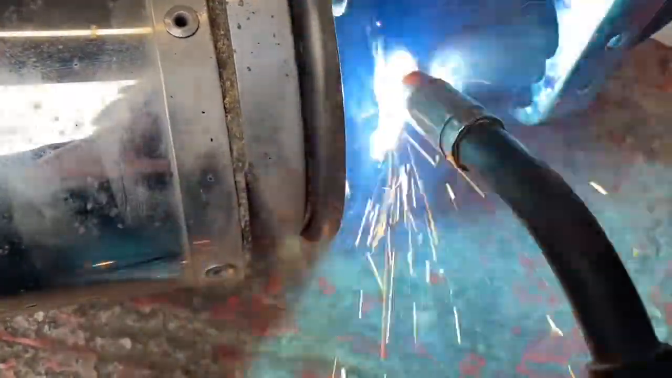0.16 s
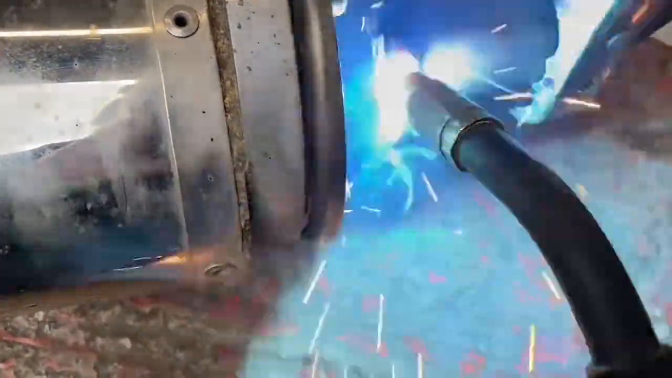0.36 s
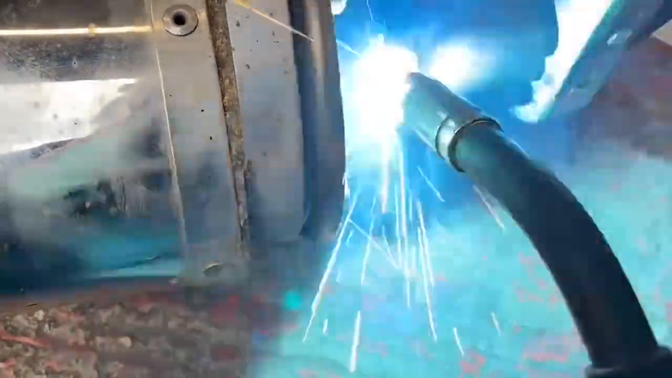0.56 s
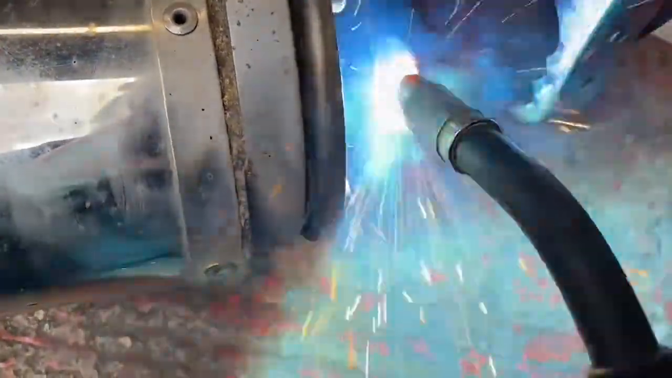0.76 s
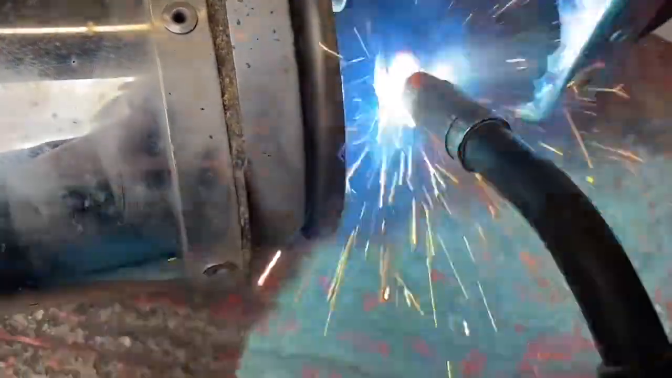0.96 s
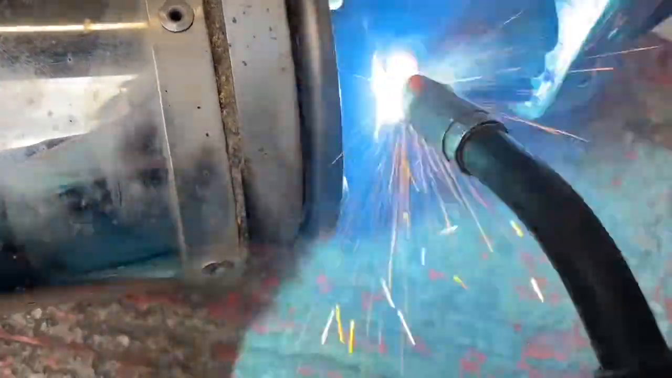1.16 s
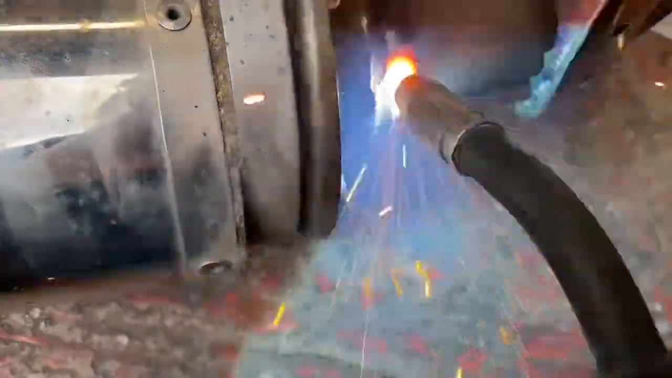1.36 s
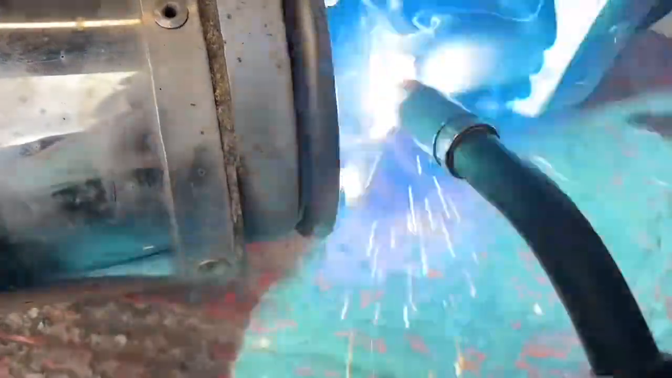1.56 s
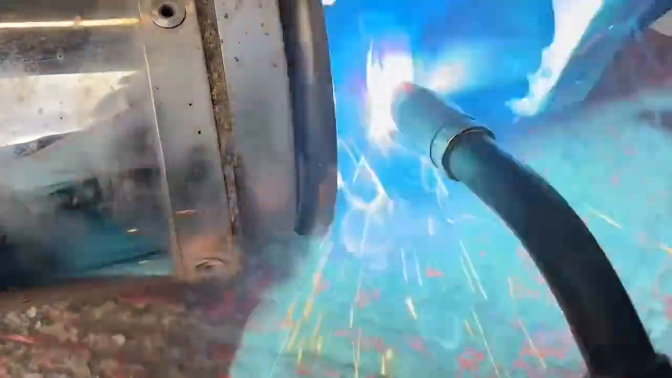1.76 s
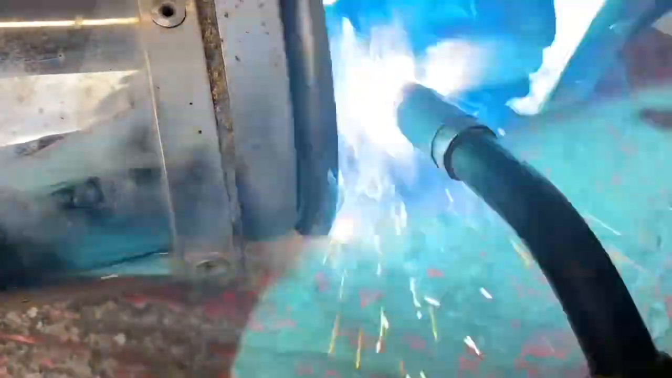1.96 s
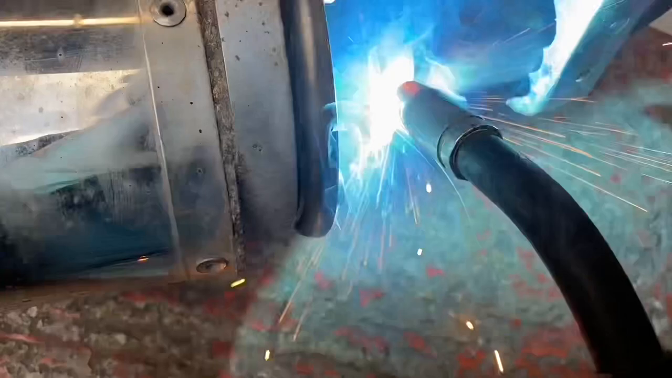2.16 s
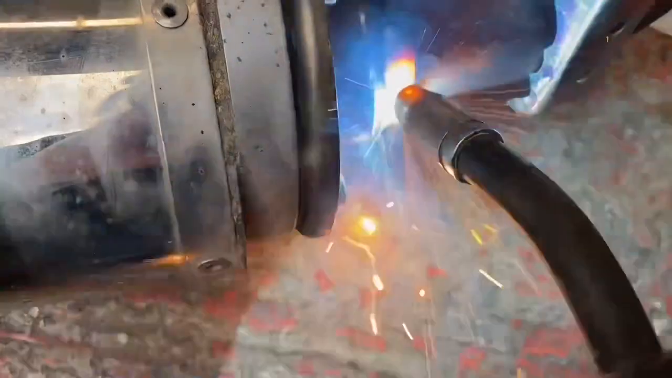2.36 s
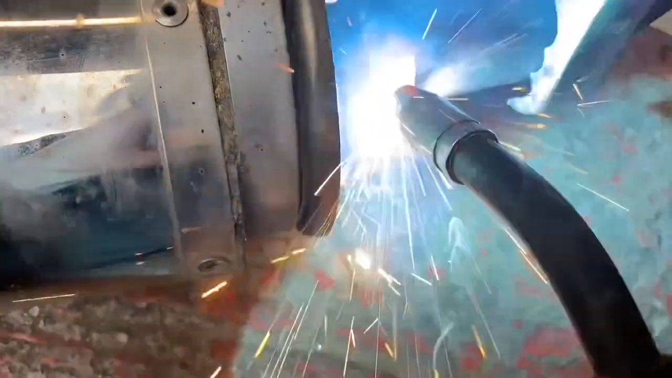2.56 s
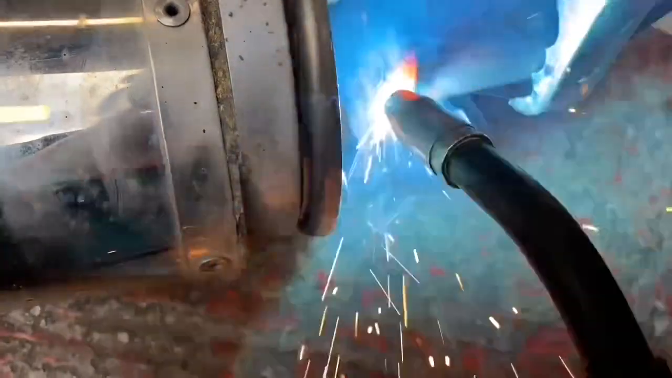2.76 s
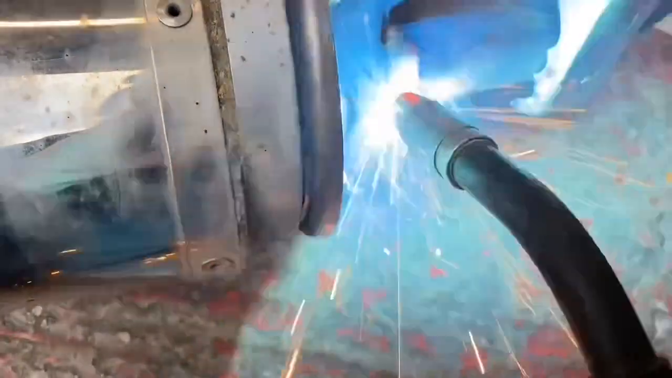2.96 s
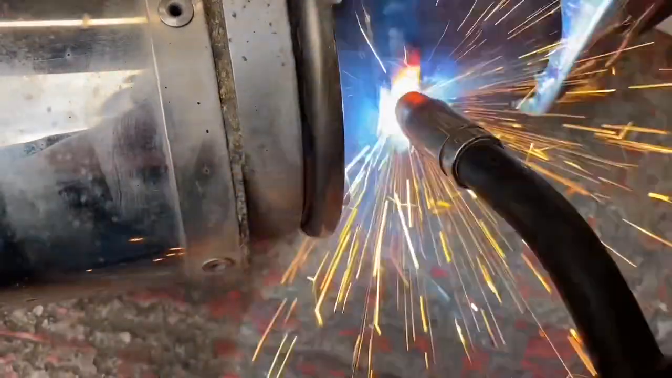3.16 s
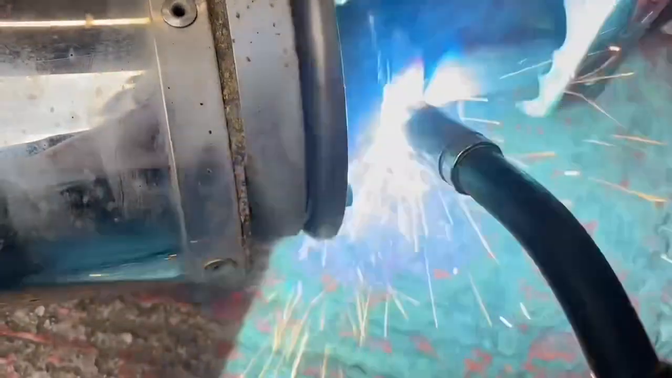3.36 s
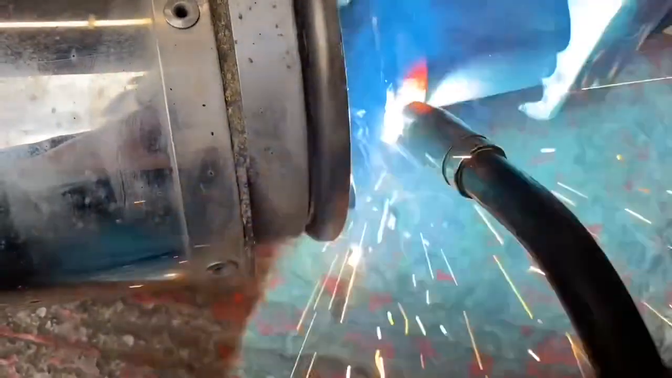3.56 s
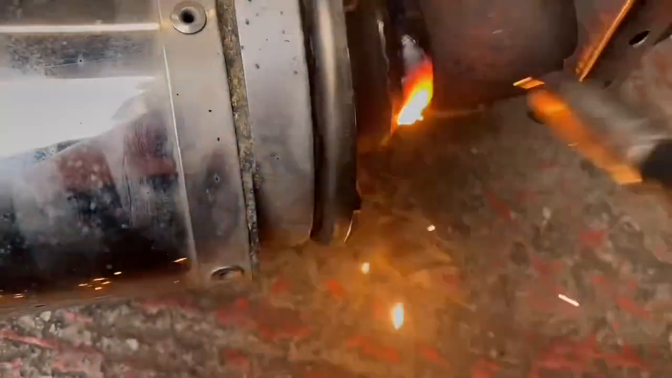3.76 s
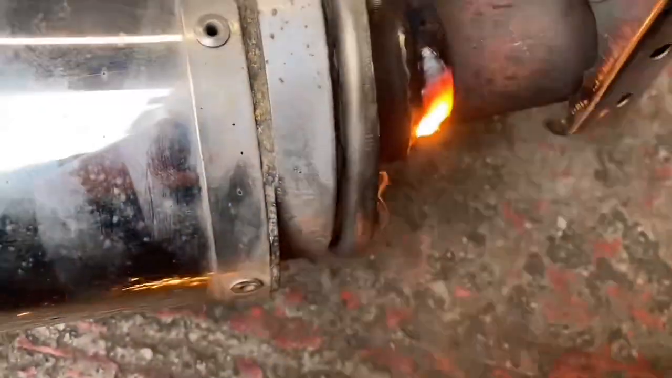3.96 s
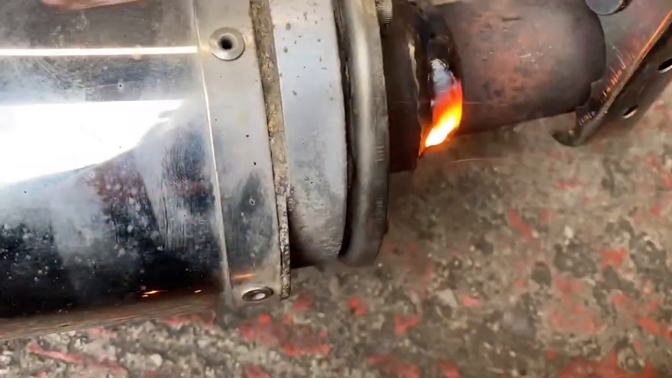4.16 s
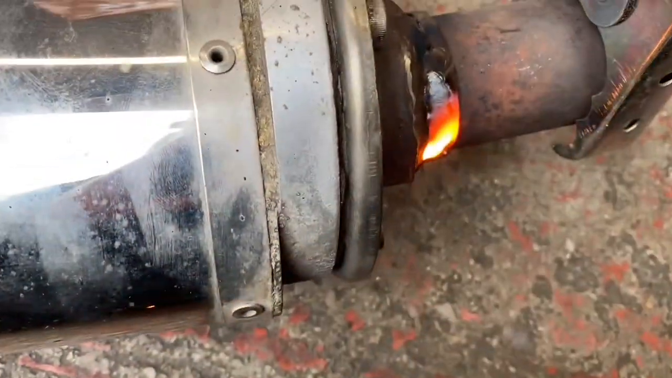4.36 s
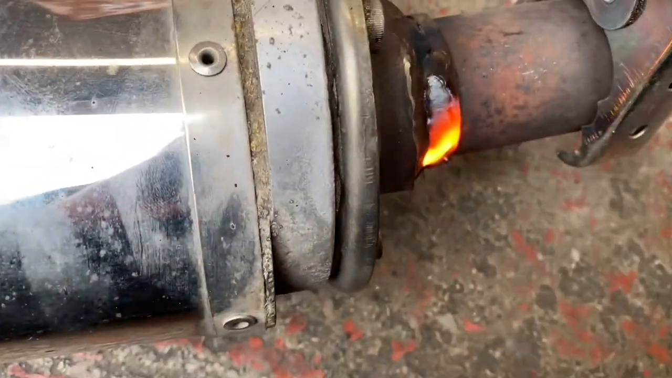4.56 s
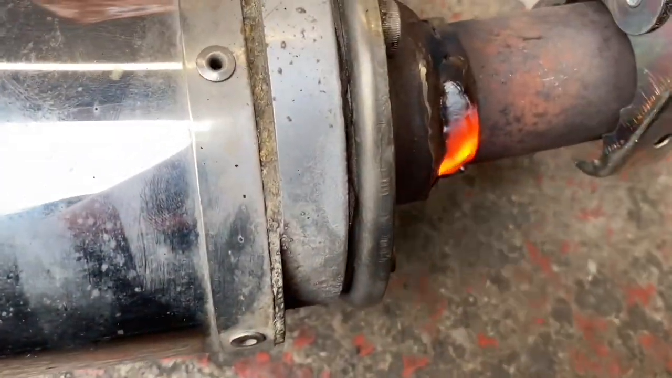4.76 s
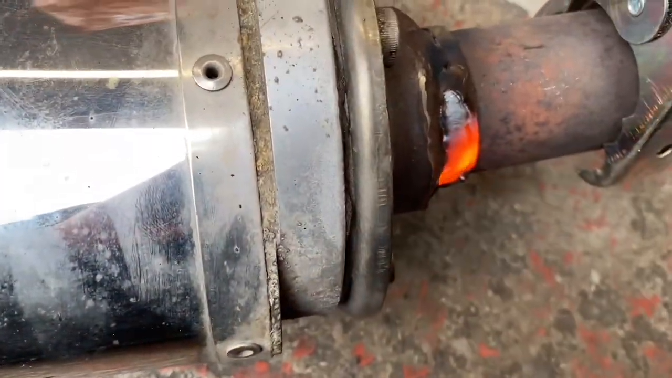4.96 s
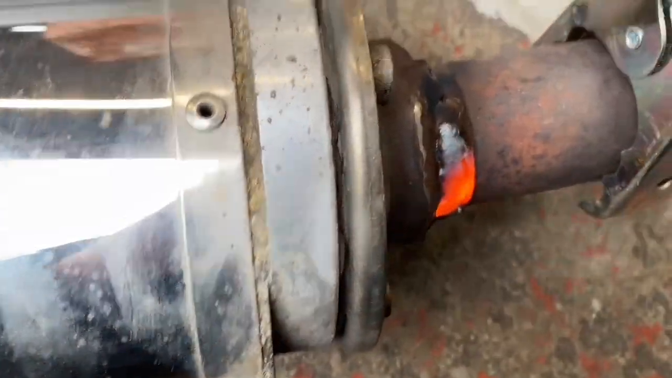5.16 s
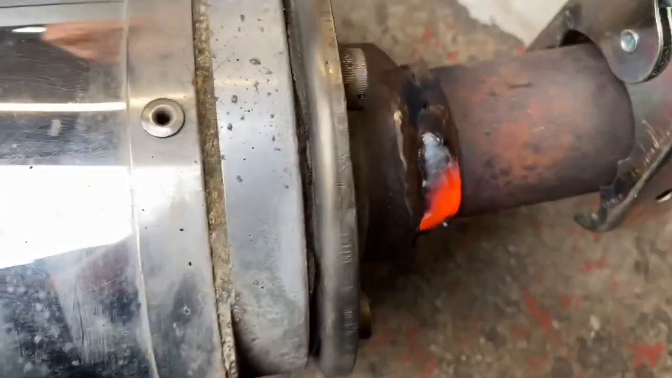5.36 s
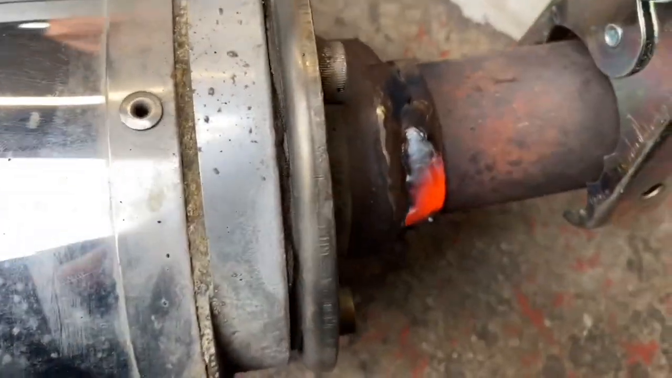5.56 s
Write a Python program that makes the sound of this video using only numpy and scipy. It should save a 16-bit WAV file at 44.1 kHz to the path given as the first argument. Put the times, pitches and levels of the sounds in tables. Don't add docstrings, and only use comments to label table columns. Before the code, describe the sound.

Harsh stereo crackle from half a metre away: dozens of dry electrical pops per second, a few heavier with a blunt puff, colored by ringing metal and close reflections in a hard workshop. After more than three seconds the arc ends at once; only low hum, dull hiss, light far-off clinks and hand movement on the phone remain, very quiet.

```python
import sys
import numpy as np
from scipy import signal
from scipy.fft import rfft, irfft, next_fast_len
from scipy.io import wavfile
from scipy.ndimage import uniform_filter1d, minimum_filter1d

SR = 44100
rng = np.random.default_rng(int(sys.argv[2]) if len(sys.argv) > 2 else 0)


def materialize(psi):
    bounded = np.clip(np.atleast_2d(psi).T, -1, 1)
    quanta = np.round(bounded * 32767).astype(np.int16)
    wavfile.write(sys.argv[1], SR, quanta)


def elevation(decibels):
    levels = np.asarray(decibels, float)
    return 10 ** (levels / 20)


N = 247401
T = np.arange(N) / SR
HZ = np.fft.rfftfreq(N, 1 / SR)
MAINS_HZ, ARC_OFF_S = 50, 3.63

# (time
# [s], level [dB])
STRIKES = [(0.0042, -18.5), (0.0116, -21), (0.0323, -7.5), (0.0624, -5), (0.0808, -19.5),
           (0.0868, -22.5), (0.1143, -6.5), (0.1399, -10.5), (0.1552, -22), (0.1621, -4.5),
           (0.176, -18.5), (0.181, -21), (0.181, -9.5), (0.1842, -12), (0.2017, -5.5), (0.224, -16),
           (0.232, -7), (0.2513, -28), (0.2621, -6), (0.267, -26.5), (0.2809, -5.5), (0.301, -11.5),
           (0.3322, -8.5), (0.3422, -5.5), (0.3573, -23), (0.3787, -15), (0.3929, -5.5),
           (0.401, -11.5), (0.413, -10.5), (0.415, -16.5), (0.4241, -11.5), (0.431, -19), (0.442, -8),
           (0.4745, -26.5), (0.4838, -24), (0.4919, -8), (0.5047, -14), (0.5123, -9.5),
           (0.527, -28.5), (0.532, -7), (0.562, -7), (0.5843, -5), (0.601, -5), (0.617, -11.5),
           (0.6226, -11), (0.632, -10), (0.6461, -24.5), (0.6518, -8.0), (0.665, -22), (0.6716, -7.5),
           (0.6939, -7.5), (0.7138, -11), (0.724, -23.5), (0.732, -7.5),
           (0.745, -25), (0.7513, -7.5), (0.7548, -10.5), (0.764, -11), (0.7719, -9), (0.775, -8.5),
                 (0.7845, -16), (0.7924, -7.5), (0.8064, -31), (0.8124, -9.5), (0.83, -31), (0.8398, -10.5),
                 (0.852, -8.5), (0.8692, -13.5), (0.8829, -9), (0.8927, -6), (0.901, -14), (0.9124, -14.5),
                 (0.9315, -9), (0.9503, -24.5), (0.9637, -5), (0.9725, -9), (0.9862, -14), (0.9933, -24.5),
                 (1.004, -28), (1.0124, -9.5), (1.0214, -7), (1.0311, -11), (1.043, -10.5), (1.0552, -10.5),
                 (1.0623, -14), (1.0885, -18.5), (1.1038, -10.5), (1.1118, -11), (1.1337, -13),
                 (1.1407, -10.5), (1.1632, -18), (1.1726, -12), (1.182, -8), (1.185, -12.5), (1.1956, -16),
                 (1.202, -9.5), (1.2143, -12), (1.2214, -5), (1.224, -7), (1.2458, -18), (1.2733, -6.5),
                 (1.298, -16.5), (1.3123, -8.5), (1.3212, -8), (1.3502, -9.5), (1.3705, -23.5),
                 (1.3749, -11), (1.4022, -4),
           (1.4143, -19), (1.4213, -6), (1.424, -10.5), (1.4323, -9.5), (1.4454, -22.5), (1.448, -17),
                 (1.4631, -8.5), (1.4741, -4.5), (1.4826, -7.5), (1.4918, -4), (1.506, -27), (1.5134, -9),
                 (1.5345, -8.5), (1.5396, -8.5), (1.561, -6.5), (1.5832, -20), (1.5902, -11), (1.5932, -8),
                 (1.6045, -16), (1.6106, -5.5), (1.6213, -11), (1.631, -19), (1.635, -8), (1.643, -5.5),
                 (1.654, -5.5), (1.6717, -4.5), (1.693, -18.5), (1.7005, -10.5), (1.711, -11), (1.723, -34),
                 (1.7315, -29.5), (1.7402, -10), (1.7612, -14.5), (1.765, -10.5), (1.7825, -18),
                 (1.7935, -7), (1.8027, -7), (1.8284, -16.5), (1.85, -26), (1.8602, -11), (1.8827, -11),
                 (1.9032, -10.0), (1.911, -11.0), (1.9139, -9), (1.9315, -9.5), (1.9543, -11),
                 (1.9606, -11.5), (1.9815, -7), (1.9846, -8), (2.0044, -19.5), (2.0113, -10.5),
                 (2.041, -10.5), (2.0638, -9), (2.085, -34),
           (2.094, -25), (2.1024, -8), (2.1238, -3.5), (2.1444, -19.5), (2.1503, -9), (2.1708, -8),
                   (2.192, -22), (2.1955, -13.5), (2.203, -12.5), (2.211, -24.5), (2.2153, -17),
                   (2.2224, -26.5), (2.2333, -11.5), (2.2528, -5.5), (2.273, -18.5), (2.275, -17.5),
                   (2.2945, -15), (2.3035, -27), (2.32, -9.5), (2.3408, -11.5), (2.3623, -25),
                   (2.3732, -11.5), (2.3795, -15), (2.396, -21.5), (2.4125, -9.5), (2.432, -26.5),
                   (2.444, -15), (2.4511, -10), (2.4727, -12.5), (2.493, -7.5), (2.498, -16.5),
                   (2.5206, -9), (2.5318, -9), (2.5619, -6), (2.5717, -9), (2.5867, -29), (2.6013, -26),
                   (2.6196, -12.5), (2.631, -9.5), (2.644, -26.5), (2.651, -15.5), (2.672, -9),
                   (2.7008, -6), (2.7315, -6), (2.7536, -23), (2.765, -14.5), (2.7825, -1), (2.8034, -1),
                   (2.8234, -24), (2.8245, -24), (2.8284, -30), (2.8437, -28), (2.8514, -11.5),
                   (2.8613, -18),
           (2.8802, -26), (2.891, -8), (2.9209, -10), (2.9433, -13.5), (2.967, -29), (2.9706, -11.5),
                (2.9813, -9.5), (3.004, -9.5), (3.0256, -16.5), (3.0399, -10), (3.0541, -16.5),
                (3.061, -14), (3.0716, -11), (3.0807, -12.5), (3.093, -15.5), (3.102, -11), (3.115, -25),
                (3.1205, -10), (3.1329, -10), (3.141, -6), (3.154, -16), (3.161, -13), (3.165, -15),
                (3.1727, -14), (3.1912, -9.5), (3.212, -11), (3.2331, -13.5), (3.243, -3.5), (3.2615, -7.5),
                (3.2852, -25.5), (3.302, -3.5), (3.3323, -2), (3.354, -24.5), (3.3612, -2.5),
                (3.3645, -5.5), (3.384, -8.5), (3.4124, -7.5), (3.4352, -5.5), (3.44, -7), (3.4627, -2.5),
                (3.4817, -14), (3.5024, -6.5), (3.5203, -6.5), (3.5236, -8), (3.5354, -33.5),
                (3.5429, -5.5), (3.5624, -14), (3.5655, -18.5), (3.58, -16), (3.5957, -10.5),
                (3.6015, -9.5), (3.612, -13.5), (3.6208, -10.5)]
# (frequency [Hz], gain [dB])
SPIT_COLOUR = [(600, -4.5), (1900, -5.5), (3500, -3), (5500, -2), (10000, -1.5), (16000, -0.5)]
# (time [s], length [s], level [dB])
BURNS = [(0.144, 0.069, -50), (0.387, 0.04, -29), (0.577, 0.062, -34.5), (0.747, 0.068, -36),
         (0.872, 0.053, -46.5), (0.956, 0.036, -37), (1.01, 0.052, -32.5), (1.16, 0.078, -38),
         (1.395, 0.11, -36.5), (1.588, 0.082, -29.5), (1.898, 0.021, -37), (2.195, 0.015, -42),
         (2.498, 0.044, -45.5), (2.556, 0.031, -40), (2.611, 0.055, -39.5), (2.774, 0.034, -45.5),
         (3.049, 0.13, -43), (3.237, 0.019, -38.5), (3.292, 0.052, -40), (3.35, 0.04, -53),
         (3.52, 0.051, -60), (3.584, 0.04, -53)]
# (delay [s], level [dB], lower edge [Hz])
MIRRORS = [
    (.0025, -16, 4500),
    (.00294, -14.5, 9000),
    (.0065, -19.5, 4500),
]
# (frequency [Hz], width [Hz], left [dB], right [dB])
RESONANCES = [(318, 430, -7.5, 5), (1175, 640, 2.5, 5), (1660, 310, 14, 14), (1874, 432, 12, 19.5),
              (2130, 350, 4.5, 14.5), (2857, 450, 13.5, 16), (3272, 150, -14, 18), (3900, 450, -0.5, 13.5),
              (4657, 850, 1.5, 4), (5463, 630, 10, 22.5), (6220, 370, 10, 16.5), (7017, 240, 9.5, 17),
              (7740, 500, 3.5, 12.5), (8197, 270, 6, 13), (9240, 440, 12.5, 8), (10280, 1000, 3, 7),
              (11530, 1000, 7.5, 13), (13600, 1000, 4, 2.5), (12600, 430, 1.5, 14), (14600, 410, 3, 9.5),
              (15420, 560, 8, 11), (16300, 700, -6, -3)]
# (frequency [Hz], lead [rad])
LEFT_LEADS = [(0, 0), (700, -0.4), (1150, 0.9), (1700, -0.3), (2000, -0.3), (3100, -2.5), (3500, -2.4),
              (3750, -1), (4400, -0.7), (5000, -4.2), (5800, -4.3), (6500, -0.3), (7700, 0.7), (8300, 3),
              (16000, 13)]
# (frequency [Hz], gain [dB])
WALL_COLOUR = [(400, 6), (1800, -8.5), (3500, -11), (5500, 12.5), (8800, -15), (11300, -2), (13300, -13.5),
               (15500, -8), (16100, -30)]
# (time [s], length [s], level [dB])
HUM_SWELLS = [(.27, 0.27, -38), (.8, 0.35, -42), (1.36, 0.15, -51.5), (1.6, 0.046, -60), (1.98, 0.34, -49),
              (2.47, 0.12, -43.5), (2.66, 0.15, -46), (3.0, 0.31, -39.5), (3.37, 0.09, -40),
              (3.48, 0.093, -37), (3.63, 0.068, -40.5), (3.82, 0.055, -57), (4.92, 0.26, -59.5)]
# (time [s], length [s], level [dB])
GRIPS = [
    (4.1, 0.05, -69),
    (4.23, 0.091, -65),
    (4.78, 0.14, -51.5),
    (4.96, 0.11, -50.5),
    (5.22, 0.22, -51.5),
    (5.5, 0.18, -51.5),
]
# (time [s], length [s], level [dB])
DRAG = [
    (5.25, .4, -60),
]
# (time [s], level [dB])
SHOP_LEVEL = [
    (3.7, -64.5),
    (3.768, -70),
    (4.2, -72),
    (4.566, -76),
    (4.832, -77),
    (5.124, -75),
    (5.61, -75.5),
]
# (frequency [Hz], density [dB per Hz])
SHOP_COLOUR = [(25, -30), (110, -16.5), (170, -10.5), (250, -11), (420, -28), (650, -30.5), (1400, -27),
               (3300, -40), (4600, -45), (5600, -41.5), (7500, -52.5), (8400, -74.5), (9500, -72),
               (11000, -57.5), (14000, -72)]
# (time [s], level [dB], sag
# [s])
PUFFS = [(0.0613, -16.5, 0.00033), (1.425, -15, 0.00042), (1.465, -27, 0.00031), (1.474, -20.5, 0.0032),
         (1.4846, -32.5, 0.006), (1.654, -4.5, 0.00087), (2.125, -24.5, 0.0014), (2.255, -3, 0.00015),
         (2.8035, 0, 0.00059), (3.2436, -15, 0.0021), (3.302, -9, 0.0013), (3.334, 0, 0.0003),
         (3.3603, -18.5, 0.0003), (3.4633, -8, 0.0004), (3.601, -27, 0.003), (3.519, -16.5, 0.0006),
         (3.619, -21.5, 0.00072), (4.828, -40, 0.0002), (5.546, -36, 0.00017)]
# (time [s], level [dB], ring T60 [s], left minus right [dB], treble [dB])
CLANKS = [(3.856, -60, 0.03, -3, 4), (3.918, -65.5, 0.84, -4.5, 4), (4.118, -45.5, 0.41, -4, 0),
          (4.03, -66, 0.4, -3, 3), (4.27, -67, 0.2, -1.5, -2), (4.362, -73, 0.05, 0, -5),
          (4.8271, -55.5, 0.051, -6, -10.5), (4.8725, -62.5, 0.74, -6, -8), (4.985, -42.5, 0.31, -4, 0.7),
          (4.918, -72, 0.1, -5, -3), (5.222, -70, 0.1, -3, -5), (5.272, -66, 0.2, 2, 6),
          (5.449, -69, 0.1, -2, -5), (5.545, -59.5, 0.032, -5, -12)]
# (frequency [Hz], density [dB per Hz])
CLANK_COLOUR = [(290, -28.5), (500, -5), (604, -13), (1020, -5), (1500, -2.5), (2500, -3), (4200, -12),
                (5600, -0.5), (6600, -11), (8000, -8), (8500, -38), (9500, -27), (10100, -7), (11100, -6),
                (12300, -11.5), (13200, -36), (14000, -30), (15200, -12), (16000, -38)]
# (time [s], frequency [Hz], level [dB], T60 [s])
PINGS = [
    (4.3, 1431, -71, 0.9),
    (4.918, 5360, -66, 0.13),
    (5.222, 2070, -70, 0.3),
    (5.222, 3900, -74, 0.35),
    (5.222, 5360, -75, 0.3),
    (5.27, 6150, -75, 0.2),
]
BAND_EDGES_HZ = [2600, 3400, 4300, 5200, 6200, 7200, 8200, 9600, 11000, 12400, 13800, 15000, 16000, 17200]
# (frequency [Hz], level [dB])
GATE_DB = [(2600, -32), (3400, -28), (4300, -31), (6200, -32), (7200, -27), (8200, -19), (9600, -25),
           (11000, -26), (12400, -21), (13800, -21), (15000, -25), (16000, -25)]


def unit(x):
    return x / np.sqrt(np.mean(x ** 2))


def colour(x, points):
    hz, db = np.transpose(points)
    return irfft(rfft(x) * elevation(np.interp(np.log(HZ + 1), np.log(hz), db)), N)


def ring(hz, width_hz):
    return unit(irfft(rfft(rng.standard_normal(N)) / (1 + ((HZ - hz) / width_hz) ** 2), N))


def walk(rate):
    k = int(SR / rate)
    return unit(uniform_filter1d(uniform_filter1d(rng.standard_normal(N), k), k))


def tail(t60, shape):
    t = T[:int(1.2 * t60 * SR)]
    x = rng.standard_normal((shape, len(t))) * elevation(-60 * t / t60)
    return x / np.sqrt(np.sum(x ** 2, axis=1, keepdims=True))


def through(x, response):
    return signal.fftconvolve(np.atleast_2d(x), response, axes=1)[:, :N]


def causal(log_gain):
    cepstrum = irfft(log_gain)
    half = cepstrum.shape[-1] // 2
    cepstrum[..., 1:half] *= 2
    cepstrum[..., half + 1:] = 0
    return np.exp(rfft(cepstrum))


def swells(table, edge_s):
    gate = sum(elevation(db) * (T > s) * (T < s + length) for s, length, db in table)
    k = int(edge_s * SR)
    return uniform_filter1d(uniform_filter1d(gate, k), k)


def loaded(on_db, idle_db, unload_s=0.11):
    return elevation(idle_db) + elevation(on_db) * np.exp(-np.maximum(T - ARC_OFF_S, 0) / unload_s)


def strike_times(count=20, spatter_db=-37.5, spread_db=0.5):
    s, db = np.transpose(STRIKES)
    faint_db = spatter_db + spread_db * rng.standard_normal(count)
    return np.concatenate([s, ARC_OFF_S * rng.random(count)]), np.concatenate([db, faint_db])


def strikes(spit_db=-2.5, spit_s=0.0018, creak_s=0.0006, apart=0.71, weak_db=-17, gain_db=12.5,
            body_db=-30, scatter_db=3, late_s=.00105, wander_s=.000003):
    s, db = strike_times()
    taps = np.arange(-60, 300)
    chance = rng.standard_normal((len(s), 3, len(taps)))
    weak = np.clip((weak_db - db[:, None]) / 6, 0, 1)
    decay_s = np.where(taps > 0, spit_s, creak_s)
    fade = np.exp(-np.abs(taps) / SR / decay_s / (1 + .9 * weak))
    fade_unit = fade / np.sqrt(np.sum(fade ** 2, axis=1, keepdims=True))
    level = elevation(db + gain_db)[:, None]
    at = np.clip((s + late_s) * SR + chance[:, 2, 1], 60, N).astype(int)[:, None] + taps
    snaps, sparks = np.zeros((2, 2, N))
    for port in 0, 1:
        grains = chance[:, 2] + apart * chance[:, port]
        spit = elevation(spit_db) * grains * fade_unit * (1 + 0.61 * weak)
        np.add.at(sparks[port], at, level * spit)
        snap = np.zeros(spit.shape)
        push_db = body_db + scatter_db * chance[:, 2, :1] + 4 * chance[:, port, 1:2]
        snap[:, 52:82] += elevation(push_db) * np.hanning(30)
        pulse = np.sinc(taps - wander_s * SR * chance[:, port, :1]) * (np.abs(taps) < 9)
        snap += (1 - .7 * weak) * pulse
        np.add.at(snaps[port], at, level * snap)
    return snaps + colour(sparks, SPIT_COLOUR)


def sizzle(ripple=0.14, grain_db=4, glow_db=-42):
    burning = elevation(glow_db + 2 * walk(22)) * (T < ARC_OFF_S)
    for s, length, db in BURNS:
        burning = burning + elevation(db) * (T > s) * (T < s + length)
    swell = 1 + ripple * np.cos(2 * np.pi * 2 * MAINS_HZ * (T - .004))
    grains = rng.standard_normal(N) * elevation(grain_db * walk(400))
    return uniform_filter1d(burning, size=100) * swell * unit(grains)


def near_echoes(tilt_db, apart=0.54, t60_s=0.018, level_db=-2.5, floor_echo_s=0.0046, after_db=-6,
                low_hz=4000, low_db=-11):
    echoes = tail(t60_s, 1) + apart * tail(t60_s, 2)
    echoes = echoes * elevation(level_db + after_db * (T[:echoes.shape[1]] > floor_echo_s))
    hz = np.linspace(1, SR / 2, 2049)

    def above(edge_hz):
        return 1 / (1 + (edge_hz / hz) ** 6)

    spectrum = 1 + rfft(echoes, 4096) * np.maximum(above(low_hz), elevation(low_db))
    drift = 1 + .004 * rng.standard_normal((len(MIRRORS), 2, 1))
    mirrors = 1
    for (s, db, edge_hz), d in zip(MIRRORS, drift):
        mirrors = mirrors + elevation(db) * above(edge_hz) * np.exp(-2j * np.pi * hz * s * d)
    tilt = elevation(tilt_db * np.log2(np.linspace(300, SR / 2, 2049) / 5000))
    broad = uniform_filter1d(np.abs(spectrum) ** 2, size=24)
    even = causal(np.log(tilt) - .5 * np.log(broad))
    return irfft(spectrum * mirrors * even)[:, :1024]


def nozzle(ahead=0.44, early_cycles=1.2):
    f, w, *side_db = np.transpose(RESONANCES)[:, :, None]
    hz = np.linspace(0, SR / 2, 2049)
    peak = 1 / (1 + (2 * (hz - f) / w) ** 2) ** 1.476
    left, right = (np.sum(elevation(2 * db) * peak, axis=0) for db in side_db)
    log_gain = .5 * np.log(right / right.mean())
    ring_s = irfft(causal((1 - ahead) * log_gain) * np.exp(ahead * log_gain))
    response = rfft(np.roll(ring_s, 512), N) * np.exp(2j * np.pi * HZ * 512 / SR)
    response = response * np.exp(2j * np.pi * early_cycles * np.log((HZ + 400) / (HZ + 2500)))
    shadow = np.clip((7400 - hz) / 600, 0, 1)
    lead = np.exp(1j * np.interp(HZ, *np.transpose(LEFT_LEADS)))
    left_over_right = np.interp(HZ, hz, np.sqrt(left / right) ** shadow) * lead
    return response * np.array([left_over_right, np.ones(len(HZ))])


def arc(sizzle_top_hz=9000, room_t60_s=0.38, room_db=-24.5, room_apart=0.4):
    dry = strikes() + signal.lfilter(*signal.butter(1, sizzle_top_hz, fs=SR), sizzle())
    along = np.clip(T / 3.6, 0, 1) * np.pi / 2
    root = np.clip(.5 + .6 * walk(25), 0, 1)
    near = 0
    for share, tilt_db in (np.cos(along), -.3), (np.sin(along), 1.2):
        for place in root, 1 - root:
            near = near + through(share ** 2 * place * dry, near_echoes(tilt_db))
    walls = through(dry[1], tail(room_t60_s, 1) + room_apart * tail(room_t60_s, 2))
    ports = nozzle()
    walls = irfft(rfft(walls) * np.exp(1j * np.angle(ports / ports[1])), N)
    direct = irfft(rfft(near) * ports, N)
    return (direct + elevation(room_db) * colour(walls, WALL_COLOUR)) * (T < 4.3)


def hum(hum_db=-64, hum_idle_db=-66.5, growl_db=-55.5, growl_idle_db=-72, hand_db=-75,
        swell_edge_s=0.08, grip_edge_s=0.11):
    drift = 0.9 * walk(16) + 0.5 * np.array([walk(18), walk(11.0)])
    fourth = np.sqrt(2) * np.sin(2 * np.pi * 4 * MAINS_HZ * T + drift) * elevation(2.7 * walk(45))
    core = loaded(hum_db, hum_idle_db) + swells(HUM_SWELLS, swell_edge_s)
    growl = 0.76 * ring(100, 4.7) + 0.58 * ring(65, 43) + 0.31 * np.array([ring(90, 50), ring(90, 50)])
    growl = loaded(growl_db, growl_idle_db) * elevation(0.94 * walk(21)) * growl
    grip = (elevation(hand_db) + swells(GRIPS, grip_edge_s)) * (ring(156, 8.8) + 0.35 * ring(195, 21))
    rumble = grip + swells(DRAG, grip_edge_s) * ring(78, 20)
    return core * fourth * elevation(np.array([[-1.5], [.8]])) + growl + rumble


def shop(waver_db=1.5, pan_db=-3.5, gain_db=12):
    mid, side = rfft(colour(rng.standard_normal((2, N)), SHOP_COLOUR))
    wide = 1 / (1 + (420 / (HZ + 1)) ** 4)
    hiss = irfft([elevation(pan_db * wide) * (mid + wide * side), mid - wide * side], N)
    for hz in 900, 1500, 2300:
        band = np.exp(-(np.log(HZ / hz + 1e-9) / 0.28) ** 2)
        hiss = hiss + (elevation(waver_db * walk(6)) - 1) * irfft(rfft(hiss) * band, N)
    level_db = np.interp(T, *np.transpose(SHOP_LEVEL)) + 0.41 * walk(3) + 2.0 * walk(14)
    return elevation(gain_db + level_db) * unit(hiss)


def puffs(pan_db=-1.5, edge_hz=2200, left_late_s=.0002, after_s=.001, bore_hz=930, bore_db=-15.5,
          bore_s=0.00084):
    s, db, sag_s = np.transpose(PUFFS)[:, :, None]
    out = []
    for late in left_late_s * (1 + .6 * rng.standard_normal(s.shape)), 0:
        since = np.maximum(T - s - after_s - late, 0)
        step = np.exp(-since / sag_s) - np.exp(-since * 2 * np.pi * edge_hz)
        bore = elevation(bore_db) * np.exp(-since / bore_s) * np.sin(2 * np.pi * bore_hz * since)
        out.append(np.sum(elevation(db) * (step + bore), axis=0))
    return np.array(out) * elevation(np.array([[pan_db], [0]]))


def clanks(tick_db=6, treble_hz=5000, gain_db=-12):
    noise = colour(rng.standard_normal((2, N)) * elevation(0.97 * walk(350)), CLANK_COLOUR)
    noise = noise / np.std(np.diff(noise)) * 1.2
    treble = noise - irfft(rfft(noise) / (1 + (HZ / treble_hz) ** 4), N)
    out = 0
    for s, db, t60, pan_db, treble_db in CLANKS:
        since = np.maximum(T - s, 0)
        tick = elevation(tick_db) * np.exp(-since / 0.0012)
        fade = (T >= s) * (elevation(-60 * since / min(t60, .6)) + tick)
        level = elevation(db + gain_db + np.array([[pan_db], [-pan_db]]) / 2)
        out = out + level * fade * (noise + (elevation(treble_db) - 1) * treble)
    return out


def pings(blur=5, rise_s=0.0047):
    out = 0
    for s, hz, db, t60 in PINGS:
        since = np.maximum(T - s, 0)
        width_hz = blur / t60 ** 1.5
        fade = elevation(db - 60 * since / t60) * np.minimum(since / rise_s, 1)
        out = out + fade * np.array([ring(hz, width_hz), ring(hz, width_hz)])
    return out


def scene():
    return arc() + hum() + shop() + puffs() + clanks() + pings()


def held(x, count):
    middle = np.arange(x.shape[-1]) // count * count + count // 2
    return uniform_filter1d(x, count)[..., np.minimum(middle, x.shape[-1] - 1)]


def gated(x):
    hz, _, z = signal.stft([x[0] + x[1], x[0] - x[1]], SR, nperseg=256)
    power = np.abs(z) ** 2
    loud = -minimum_filter1d(-power[:, 6:90].mean(axis=(0, 1)), size=9)
    for lo, hi in zip(BAND_EDGES_HZ, BAND_EDGES_HZ[1:]):
        band = (hz >= lo) & (hz < hi)
        level = held(power[:, band].mean(axis=1), count=2)
        whim_db = 4.5 * np.repeat(rng.standard_normal((2, len(loud) // 3 + 1)), 3, axis=1)[:, :len(loud)]
        threshold_db = np.interp(lo, *np.transpose(GATE_DB)) + whim_db
        z[:, band] *= (level > loud * elevation(2 * threshold_db))[:, None]
    z[:, hz >= BAND_EDGES_HZ[-2]] *= held(rng.random(len(loud)), count=8) > .47
    both, apart = signal.istft(z, SR, nperseg=256)[1][:, :N] / 2
    return np.array([both + apart, both - apart])


def low_pass(x):
    return signal.sosfilt(signal.butter(12, 17150, fs=SR, output="sos"), x)


def record(dry, low_hz=50, top_hz=16580, ceiling=0.9):
    size = next_fast_len(N + SR // 4)
    hz = np.fft.rfftfreq(size, 1 / SR) + 1
    late = np.exp(-2j * np.pi * 1.1 * np.log((hz + 8) / (hz + 2500)))
    cut = 1 / np.sqrt(1 + (low_hz / hz) ** 6) / np.sqrt(1 + (hz / top_hz) ** 400)
    rounded = ceiling * np.tanh(dry / ceiling)
    filtered = irfft(rfft(rounded, size) * late * cut, size)[:, :N]
    return low_pass(gated(np.clip(filtered, -1, 1)))


dry = scene()
out = record(dry)
materialize(out)
```